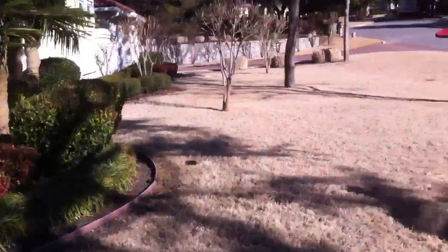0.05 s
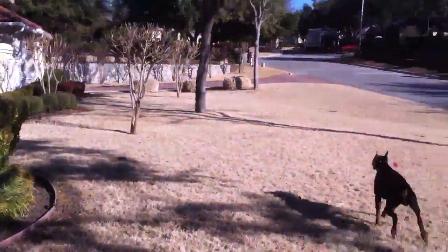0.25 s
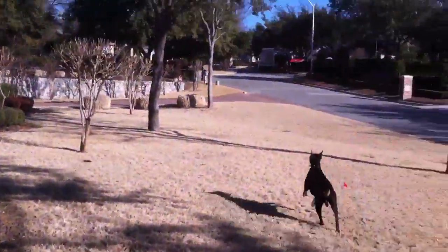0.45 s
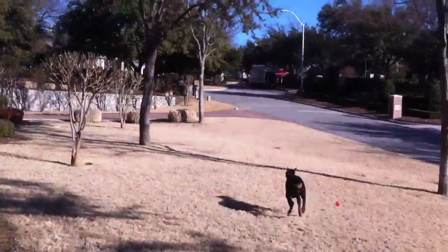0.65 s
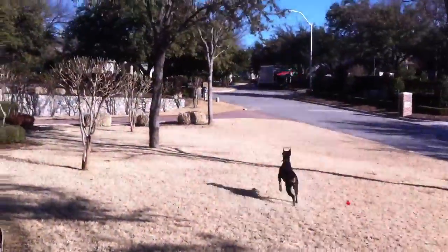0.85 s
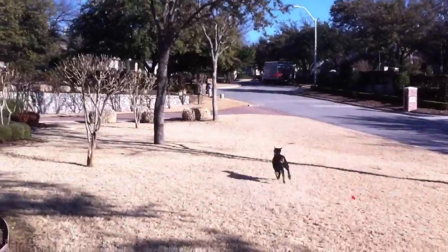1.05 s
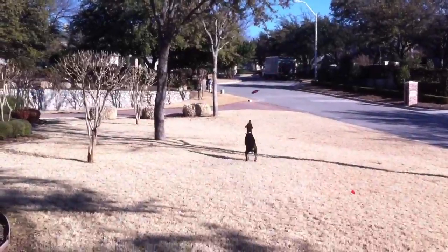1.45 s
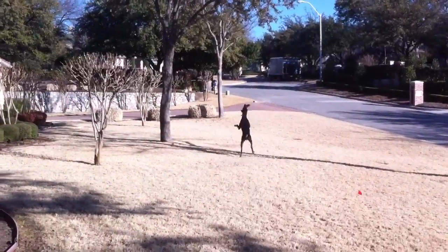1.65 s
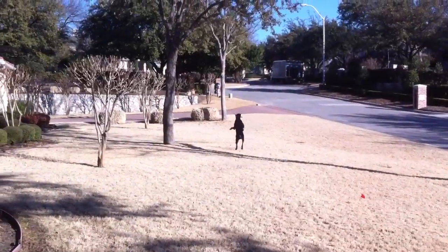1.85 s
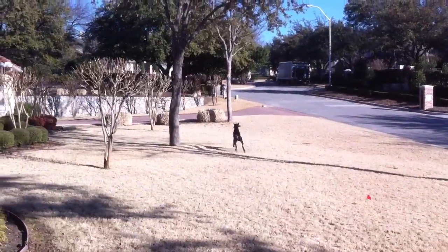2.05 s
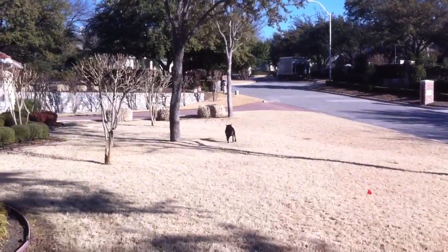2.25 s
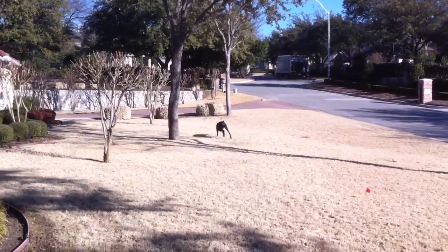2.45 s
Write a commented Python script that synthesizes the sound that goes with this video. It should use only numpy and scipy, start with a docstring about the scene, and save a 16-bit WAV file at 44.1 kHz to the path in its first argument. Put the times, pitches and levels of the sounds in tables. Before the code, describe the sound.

Two quick, close bumps on the microphone stand out after a slight sleeve rustle. The rest is quiet outdoor air: low traffic hum, faint scuffs of a dog running over dry grass, and a few soft thuds near the end.

```python
"""A dog runs off across a dry lawn, over street wash, thin hiss and the hum of a far engine.
The hand-held camera swings round: hand and sleeve rub, then two sharp knocks (0.24 s, 0.36 s).
Dry grass crunches in short bursts throughout, with small ticks and scuffs of feet on the turf.
An airy rush leads to a thin, faint whistle (1.2-1.5 s). From 1.9 s a few soft thuds follow
and a higher drone swells."""
import sys
import numpy as np
from scipy import signal
from scipy.fft import rfft, irfft, next_fast_len
from scipy.io import wavfile
from scipy.ndimage import map_coordinates

SR = 44100
rng = np.random.default_rng(int(sys.argv[2]) if len(sys.argv) > 2 else 0)


def master_out(mix):
    """Clip the mix to full scale and print it as 16-bit PCM to the path in sys.argv[1]."""
    frames = np.transpose(np.atleast_2d(mix))
    ceiling = np.clip(frames, -1, 1)
    pcm = np.round(ceiling * 32767).astype(np.int16)
    wavfile.write(sys.argv[1], SR, pcm)


N = 110250
TOP_HZ = 15850  # camera band limit


def amp(db):
    """Decibels to gain."""
    return 10 ** (np.asarray(db) / 20)


def unit(x):
    """Scale to rms 1."""
    return x / np.sqrt(np.mean(x ** 2) + 1e-20)


def along(points, hz):
    """(freq_hz, value) points read on a log axis."""
    freqs_hz, values = np.transpose(points)
    return np.interp(np.log(hz + 1), np.log(freqs_hz + 1), values)


def clock():
    """Time of every sample, s."""
    return np.arange(N) / SR


def curves(rows):
    """One value per sample for each column after the time."""
    times_s, *columns = np.transpose(rows)
    return [np.interp(clock(), times_s, column) for column in columns]


def wobble(rate_hz):
    """Smooth random curve, rate_hz knots a second."""
    knots = rng.standard_normal(int(N * rate_hz / SR) + 4)
    return map_coordinates(knots, [clock() * rate_hz])


def filtered(x, response):
    """Filter x by a gain function of frequency."""
    size = next_fast_len(N + SR // 2)
    return irfft(rfft(x, size) * response(np.fft.rfftfreq(size, 1 / SR)), size)[:N]


def noise(colour):
    """Noise of rms 1 with a (freq_hz, gain_db) colour."""
    return unit(filtered(rng.standard_normal(N), lambda hz: amp(along(colour, hz))))


def band(centre_hz, octaves):
    """Noise of rms 1 in a bell-shaped band."""
    bell = lambda hz: np.exp(-.5 * (np.log2((hz + 1) / centre_hz) / octaves) ** 2) * (hz < TOP_HZ)
    return unit(filtered(rng.standard_normal(N), bell))


def burst(centre_s, length_s, grain_db=3.5):
    """Bell-shaped envelope broken into fine grains."""
    swell = np.exp(-2 * ((clock() - centre_s) / length_s) ** 2)
    return swell * unit(amp(grain_db * wobble(400)))


def causal(gain):
    """Minimum-phase pulse with this gain spectrum."""
    cepstrum = irfft(np.log(np.maximum(gain, 1e-6)))
    half = len(cepstrum) // 2
    cepstrum[1:half] *= 2
    cepstrum[half + 1:] = 0
    return irfft(np.exp(rfft(cepstrum)))


def add(out, start_s, x):
    """Mix x into out from start_s."""
    part = out[round(start_s * SR):][:len(x)]
    part += x[:len(part)]


def rubbing(fade_s=0.024):
    """Uneven friction of hand and sleeve while the camera swings."""
    # rub envelope: time_s, level_db
    envelope = [(0, -52.5), (.06, -55), (.11, -54.5), (.18, -49), (.225, -51.5), (.255, -64), (.34, -70),
                (.42, -61), (.52, -61.5), (.7, -74.5)]
    # friction spectrum: freq_hz, gain_db
    colour = [(60, -42), (110, -12), (200, -8.5), (300, 2), (400, -9), (1150, -8), (1800, -7), (2800, -21),
              (4000, -13.5), (4900, -32), (6500, -17.5), (9100, -12.5), (12000, -18.5), (15800, -18.5)]
    level_db, = curves(envelope)
    end_s = envelope[-1][0]
    fade = np.clip((end_s - clock()) / fade_s, 0, 1)
    friction = unit(noise(colour) * amp(1.7 * wobble(152.6)))
    return fade * amp(level_db) * friction


def street():
    """Dull, slowly swelling street wash and a thin, even hiss."""
    # wash envelope: time_s, level_db
    wash_envelope = [(0, -52.5), (.35, -59), (.8, -57.5), (1.15, -54.5), (1.45, -55.5), (1.58, -53),
                     (1.72, -55.5), (2.05, -55.5), (2.3, -55.5), (2.5, -54.5)]
    # wash spectrum: freq_hz, gain_db
    wash_colour = [(15, -58), (25, -26), (49, -29), (101, -11), (195, 1.5), (278, -2), (341, -2.5),
                   (401, -3.5), (528, -7), (695, -6.5), (1100, -8), (1950, -18), (2140, -18), (3160, -27.5),
                   (6000, -35), (7800, -58), (13200, -120)]
    # hiss envelope: time_s, level_db
    hiss_envelope = [(0, -69.5), (1.4, -67.5), (1.8, -69.5), (1.97, -71), (2.2, -69), (2.5, -66)]
    # hiss spectrum: freq_hz, gain_db
    hiss_colour = [(3000, -14), (5000, -8), (7000, -3.5), (9000, -3), (11500, -4), (14000, -0.5),
                   (16000, 2)]
    wash_db, = curves(wash_envelope)
    hiss_db, = curves(hiss_envelope)
    flutter_db = .6 * wobble(40)
    wash = amp(wash_db + 0.31 * wobble(13.8)) * noise(wash_colour)
    hiss = amp(hiss_db + flutter_db) * noise(hiss_colour)
    return wash + hiss


def engine(base_hz=58.3, speed_wander=0.0058, rough_db=2):
    """Far engine: low orders swell and fade, upper ones hold; a rougher drone joins late."""
    # hum envelope: time_s, level_db
    hum_envelope = [(0, -55), (.3, -66), (.82, -62.5), (.95, -54), (1.06, -60.5), (1.18, -56.5),
                    (1.42, -56.5), (1.8, -54.5), (2.08, -58.5), (2.18, -73), (2.5, -64.5)]
    # low orders: multiple, gain_db
    low_orders = [(2, -4.5), (3, -9.5)]
    # upper orders: multiple, level_db
    steady_orders = [(4, -68.5), (6, -71.5)]
    # drone envelope: time_s, level_db
    drone_envelope = [(1.93, -82), (2.0, -58), (2.12, -58), (2.27, -59), (2.33, -68), (2.5, -70)]
    # drone tones: pitch_hz, gain_db
    drone_tones = [(349.5, 0.5), (310, -7.5)]
    hum_db, = curves(hum_envelope)
    drone_db, = curves(drone_envelope)
    rad_per_hz = 2 * np.pi * np.cumsum(1 + speed_wander * wobble(11.6)) / SR

    def tone(pitch_hz, level_db):
        """One tone, wavering in level and phase as the air moves."""
        waver_db, sway_rad = 1.2 * wobble(22), .2 * wobble(30)
        phase = pitch_hz * rad_per_hz + sway_rad + 2 * np.pi * rng.random()
        return np.sqrt(2) * amp(level_db + waver_db) * np.sin(phase)

    hum = sum(tone(order * base_hz, hum_db + db) for order, db in low_orders)
    upper = sum(tone(order * base_hz, db) for order, db in steady_orders)
    drone = sum(tone(hz, drone_db + db + rough_db * wobble(45.05)) for hz, db in drone_tones)
    return hum + upper + drone


def crunches():
    """Dry grass gives way in short, bright swells."""
    # crunches: centre_s, length_s, level_db
    swells = [(.01, 0.042, -56.5), (0.388, 0.1, -65.5), (0.463, 0.02, -62), (0.519, 0.022, -58.5),
              (0.598, 0.048, -67.5), (0.74, 0.025, -65), (0.825, 0.076, -69.5), (0.943, 0.064, -65.5),
              (1.008, 0.019, -64), (1.155, 0.021, -60.5), (1.235, 0.06, -67.5), (1.364, 0.076, -66),
              (1.541, 0.046, -65), (1.623, 0.031, -60), (1.765, 0.03, -69.5), (1.834, 0.05, -68.5),
              (2.126, 0.055, -70.5), (2.215, .03, -75), (2.29, 0.035, -66.5)]
    # grass spectrum: freq_hz, gain_db
    colour = [(1500, -60), (3500, 1), (5500, -9), (7000, -7.5), (9500, -4), (11500, -2.5), (13500, 6),
              (15800, -6), (16500, -17)]
    grass = noise(colour)
    return grass * sum(amp(db) * burst(centre_s, length_s) for centre_s, length_s, db in swells)


def scuffs():
    """Duller scrapes: a sleeve first, then feet on the turf."""
    # scrapes: centre_s, length_s, level_db, centre_hz
    scrapes = [(0.079, 0.01, -54.5, 1020), (0.179, 0.022, -53, 1520), (1.147, 0.18, -63.5, 1470),
               (1.575, 0.025, -55, 1130), (1.617, 0.021, -64, 2850), (1.868, 0.04, -56.5, 1190),
               (1.872, 0.042, -68, 2780)]
    return sum(amp(level_db) * burst(centre_s, length_s) * band(centre_hz, octaves=0.57)
               for centre_s, length_s, level_db, centre_hz in scrapes)


def knocks():
    """Dead pushes through the camera body; soft contacts lose treble, light taps lose bass."""
    # contacts: start_s, peak_db, lowpass_hz, highpass_hz
    contacts = [(0.2366, -4, 14700, 100), (0.28, -35.5, 1920, 900), (0.2994, -44.5, 5900, 910),
                (0.3614, -14.5, 1910, 71)]
    # camera body response: freq_hz, gain_db
    body = [(40, -69), (70, -12), (110, -17), (200, -4), (400, 1), (650, 4.5), (830, 3), (1200, 7),
            (1900, 4), (2700, 3), (4400, -14), (5000, -11), (6100, -12), (7200, -21.5), (8700, -14.5),
            (11000, -17), (13500, -26.5), (15800, -17.5)]
    out = np.zeros(N)
    hz = np.fft.rfftfreq(4096, 1 / SR)
    for start_s, peak_db, lowpass_hz, highpass_hz in contacts:
        contact = hz / np.hypot(hz, highpass_hz) / np.sqrt(1 + (hz / lowpass_hz) ** 6)
        pulse = causal(amp(along(body, hz)) * contact)
        add(out, start_s, -amp(peak_db) * pulse / np.abs(pulse).max())
    return out


def thuds(attack_s=0.00066, highpass_hz=125):
    """Soft blows, each one heavily damped ring with no deep bass."""
    # blows: start_s, level_db, ring_hz, t60_s
    blows = [(0.2808, -41, 990, 0.015), (1.897, -39.5, 1020, 0.022), (2.2655, -34, 300, 0.03),
             (2.282, -46, 123, .11), (2.373, -39, 302, 0.024)]
    out, t = np.zeros(N), np.arange(SR // 5) / SR
    for start_s, level_db, ring_hz, t60_s in blows:
        envelope = amp(level_db - 60 * t / t60_s) * (1 - np.exp(-t / attack_s))
        add(out, start_s, envelope * np.sin(2 * np.pi * ring_hz * t))
    return signal.sosfilt(signal.butter(2, highpass_hz, "highpass", fs=SR, output="sos"), out)


def ticks(t60_s=0.0074):
    """Tiny dry snaps that die at once."""
    # snaps: start_s, gain_db, centre_hz
    snaps = [(.2812, -42.5, 3560), (0.299, -53, 3600), (.331, -44, 8300), (.411, -54, 6500),
             (0.472, -48, 5640), (.513, -52, 6860), (0.708, -48.5, 6000), (1.755, -59, 5430),
             (1.852, -48, 2400), (1.862, -41.5, 3530), (1.879, -50, 4200), (1.894, -49, 3200),
             (2.264, -50.5, 3230), (2.466, -45, 11300)]
    out, t = np.zeros(N), np.arange(SR // 20) / SR
    for start_s, gain_db, centre_hz in snaps:
        envelope = .5 * amp(gain_db - 60 * t / t60_s)
        add(out, start_s, envelope * band(centre_hz, octaves=0.3)[:len(t)])
    return out


def whistle(air_hz=2422, jitter_hz=22, flutter_db=2.6):
    """Airy band of noise, then a thin, wavering tone."""
    # airy rush envelope: time_s, level_db
    air_envelope = [(0, -80), (.5, -70), (.85, -69), (1.02, -69.5), (1.11, -62), (1.18, -81), (1.3, -95)]
    # whistle contour: time_s, pitch_hz, level_db
    contour = [(1.17, 2900, -80), (1.21, 2845, -67), (1.25, 2820, -77), (1.275, 2815, -65),
               (1.3, 2820, -72), (1.325, 2825, -65.5), (1.35, 2900, -84), (1.39, 2660, -78),
               (1.41, 2670, -72), (1.45, 2780, -73), (1.48, 2800, -100)]
    air_db, = curves(air_envelope)
    pitch_hz, level_db = curves(contour)
    tone = np.sin(2 * np.pi * np.cumsum(pitch_hz + jitter_hz * wobble(110)) / SR)
    air = amp(air_db) * band(air_hz, octaves=0.12)
    started = clock() > contour[0][0]
    return air + amp(level_db + flutter_db * wobble(49.85)) * unit(tone) * started


def scene():
    """All sources at one microphone."""
    events = knocks() + ticks() + crunches() + scuffs() + thuds()
    return (events + rubbing() + street() + engine() + whistle())[None]


def record(dry):
    """Steep low-pass at the camera's band limit."""
    return filtered(dry[0], lambda hz: 1 / np.sqrt(1 + (hz / TOP_HZ) ** 120))[None]


dry = scene()
out = record(dry)
master_out(out)
```